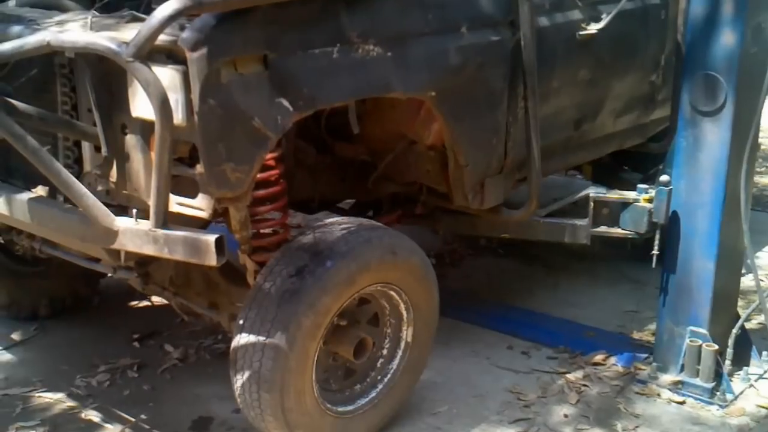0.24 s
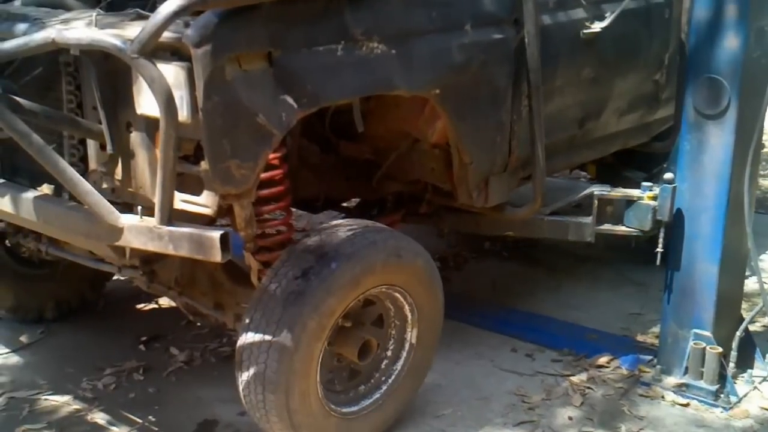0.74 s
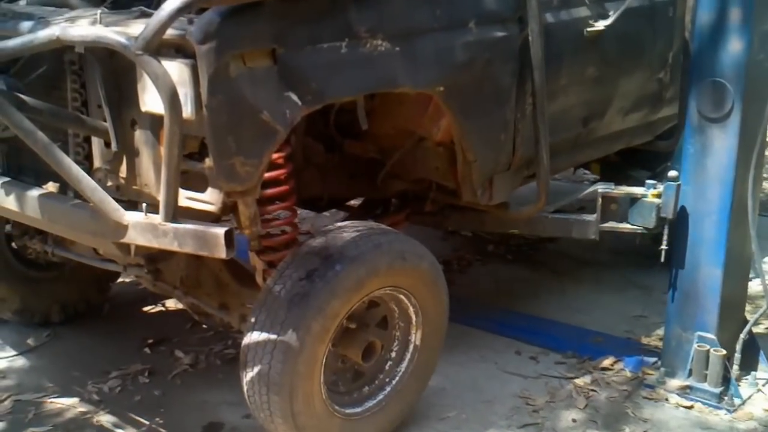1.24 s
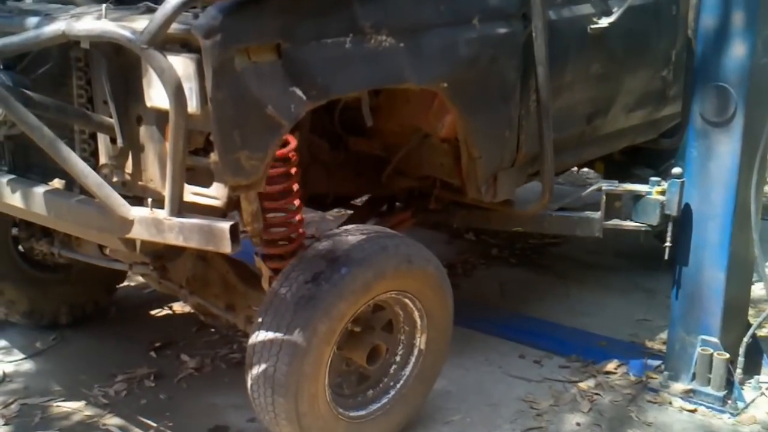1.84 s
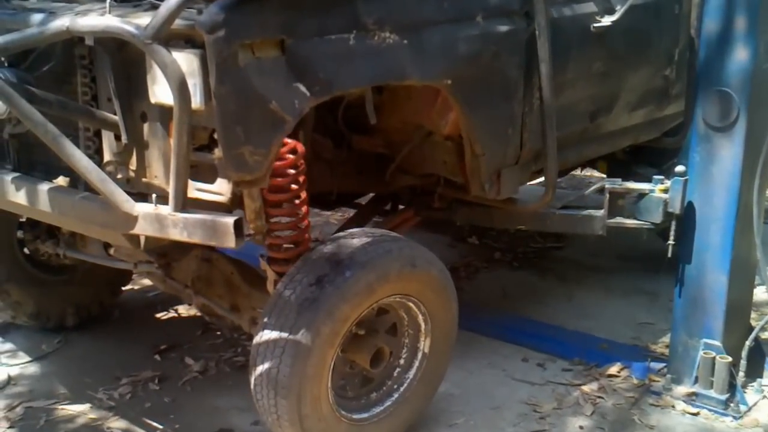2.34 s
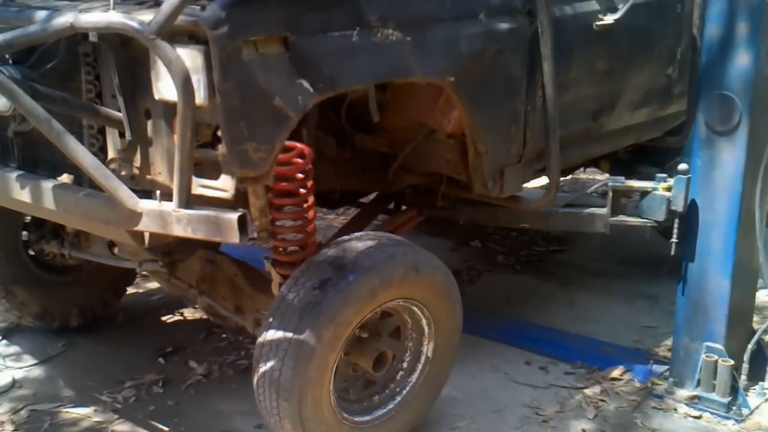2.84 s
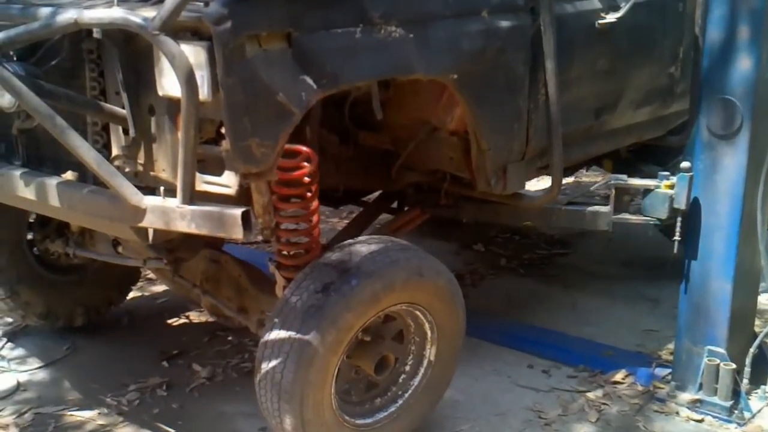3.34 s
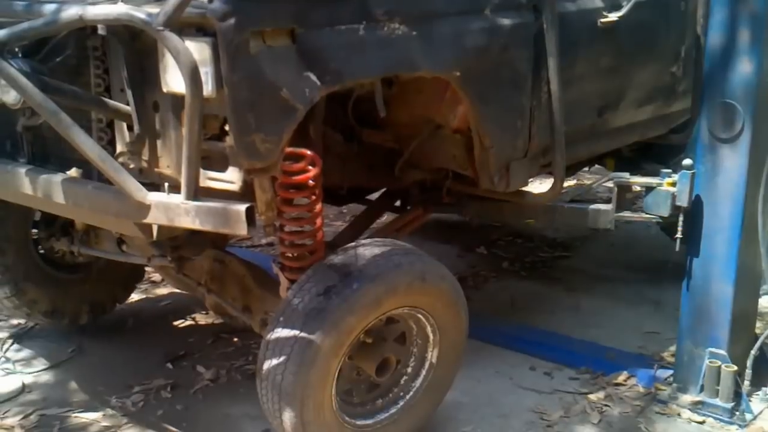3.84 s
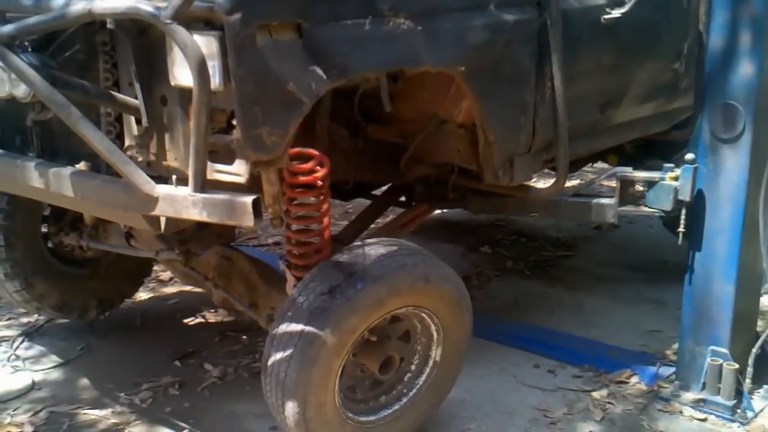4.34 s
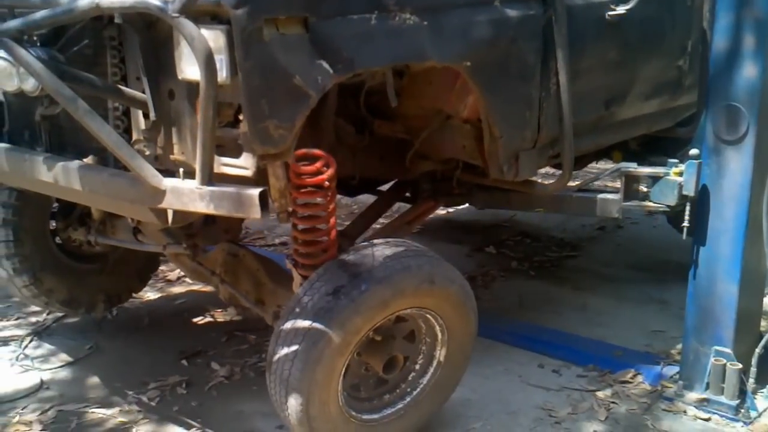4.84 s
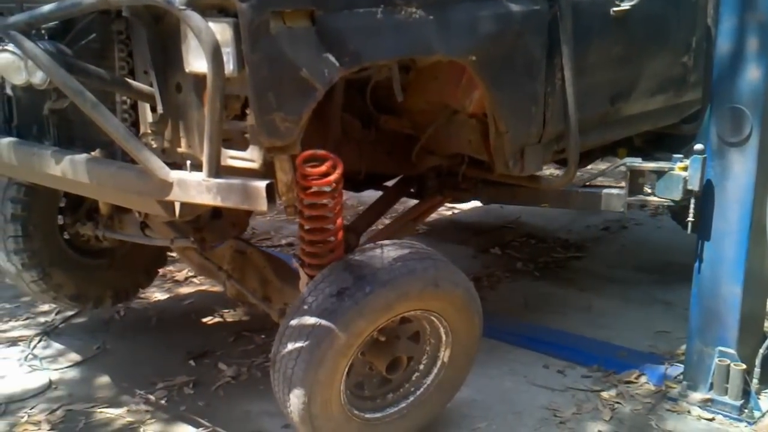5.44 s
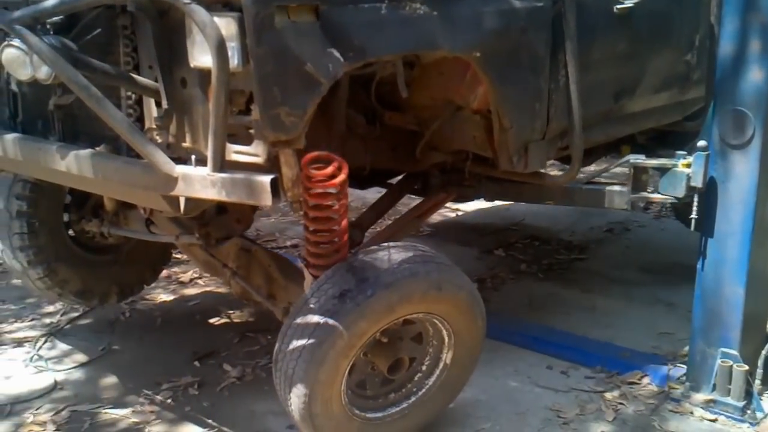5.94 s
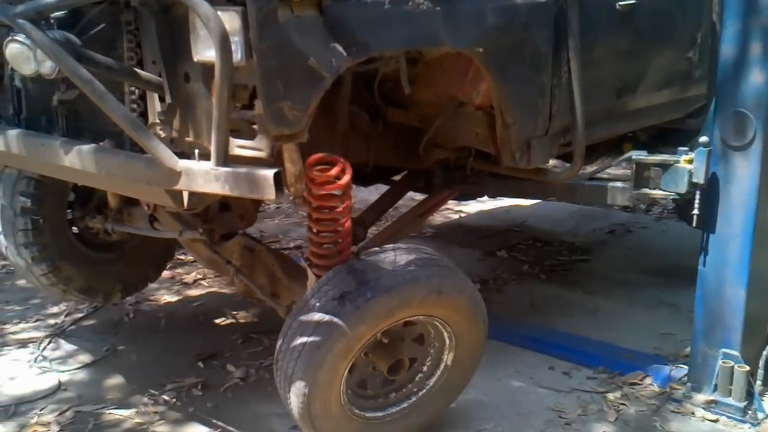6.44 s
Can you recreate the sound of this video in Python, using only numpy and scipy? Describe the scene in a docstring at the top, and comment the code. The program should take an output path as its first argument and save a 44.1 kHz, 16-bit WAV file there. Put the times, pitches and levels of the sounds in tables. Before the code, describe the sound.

An electric hydraulic pump whines steadily as a garage lift raises a truck, its safety latches clanking about every two seconds.

```python
"""An open-sided garage, heard on two spaced microphones: an electric hydraulic pump raises a two-post lift.
A worn eight-ball bearing and the pump shaft shake motor, tank and steel posts into a thicket of
wandering tones. About every two seconds the safety latches drop over a rung and bounce with a dull
clank. Underneath sit the motor's hum, a faint falling moan, the rush of oil and the hiss of the valves."""
import sys
import numpy as np
from scipy import signal
from scipy.fft import rfft, irfft
from scipy.io import wavfile

SR = 44100
rng = np.random.default_rng(int(sys.argv[2]) if len(sys.argv) > 2 else 0)


def transcribe(u):
    """Save the signal u as a 16-bit wav file named by the first command-line argument.

    u: samples, shape (n,) or (channels, n), limited to [-1, 1]; the rate is SR.
    q: integer samples, one column per channel.
    """
    v = np.clip(np.atleast_2d(u).T, -1, 1)
    q = np.round(v * 32767).astype(np.int16)
    wavfile.write(sys.argv[1], SR, q)


N = 295405

SHAFT_HZ, CAGE_HZ, BALL_HZ, BALLS = 58.74, 22.74, 240.6, 8   # settled turn rates, ball-flaw strike rate
BIN_HZ = np.maximum(np.fft.rfftfreq(N, 1 / SR), 1)
SIDES = np.array([[.5], [-.5]])   # left, right; a pan is left minus right

# the level sags after each clank and creeps back, on the quieter machine sounds: (time [s], level [dB])
MACHINE_FADER = [(0, -1), (.45, -0.5), (.7, -1.5), (2.25, 2), (2.4, -1.5), (3.2, 1), (3.55, 0), (4.2, 2.5),
                 (4.33, -1.5), (6.15, 1.5), (6.29, -3.5), (6.7, -2)]
# ball-flaw harmonics 1, 2, 3 ..: (cage sideband below [dB], harmonic [dB], cage sideband above [dB])
BALL_FLAW = [(-70, -52, -56), (-45, -44, -70), (-48.5, -70, -48.5), (-48.5, -54, -51.5), (-42.5, -70, -41),
             (-39.5, -49, -40), (-40.5, -70, -42), (-42, -54, -37), (-39, -49, -55), (-40, -35, -49),
             (-45.5, -52, -65), (-44.5, -58, -49), (-54, -70, -50), (-70, -70, -62)]
# harmonics of balls passing the outer race: (cage sideband below [dB], harmonic [dB], above [dB])
OUTER_RACE = [(-70, -54, -70), (-70, -70, -70), (-70, -48, -70), (-70, -58, -70), (-70, -53, -70),
              (-70, -70, -70), (-70, -49, -50), (-70, -47, -70), (-64, -51, -70), (-70, -39, -70),
              (-47, -43, -48), (-64, -70, -49), (-70, -70, -70), (-70, -55, -70), (-51, -52, -70),
              (-70, -70, -70), (-70, -70, -70), (-70, -59, -70), (-70, -70, -55)]
# harmonics of balls passing the inner race: (shaft sideband below [dB], harmonic [dB], above [dB])
INNER_RACE = [(-70, -49, -47.5), (-55, -56, -63), (-70, -70, -70), (-70, -50, -47.5), (-62, -49, -65),
              (-70, -52, -70), (-70, -40, -70), (-50.5, -39, -46), (-70, -52, -70), (-47, -70, -70),
              (-70, -52, -50), (-49.5, -55, -52), (-56.5, -57, -59), (-70, -61, -70)]
# shaft harmonics that stand out: (multiple of the shaft rate)
SHAFT_HARMONICS = [7, 9, 10, 18, 27, 47]
# their strengths: (level [dB])
SHAFT_LEVELS = [-42, -53, -53, -57, -62, -50]
# stray tones that follow the speed: (settled pitch [Hz])
STRAY_PITCHES = [417.9, 495.0, 1008, 1137, 1332, 1514, 1541.5, 1695.8, 1760.5, 1784.5, 1827.5, 2071.8,
                 2641.5, 3190.9, 3705, 3722]
# their strengths: (level [dB])
STRAY_LEVELS = [-48, -41.5, -60.5, -42.5, -58, -65, -48, -54, -49, -40.5, -49, -47, -44, -52, -59, -60]
# undergrowth of faint tones: (settled pitch [Hz], level [dB])
FAINT_TONES = [(216, -65), (273, -57), (327, -53), (517, -48), (600, -58), (634, -57), (664, -58),
               (728, -59), (768, -60), (786, -60), (866, -60), (963, -54), (1022, -57), (1033, -57),
               (1069, -54), (1251, -56), (1363, -56), (1497, -50), (1615, -45), (1638, -50), (1729, -46),
               (1796, -47), (1842, -49), (1865, -51), (1878, -51), (2045, -53), (2122, -50), (2263, -50),
               (2283, -44), (2344, -53), (2464, -55), (2485, -57), (2501, -57), (2524, -50), (2548, -56),
               (2569, -59), (2670, -51), (2744, -54), (2791, -54), (2939, -53), (2984, -55), (3029, -56),
               (3069, -59), (3273, -59), (3321, -58), (3345, -55), (3366, -59), (3391, -55), (3414, -60),
               (3434, -61), (3573, -63), (3587, -63), (3630, -61), (3767, -63), (3870, -65), (3946, -73),
               (3973, -67)]
# the two lead tones: (time [s], ball-flaw level [dB], outer-race level [dB])
LEAD_FADERS = [(0, -38, -49), (.3, -40, -31.5), (.55, -37, -37), (.75, -31.5, -37), (1.0, -42, -36),
               (1.35, -41, -39), (1.7, -37, -48), (1.95, -27.5, -30.5), (2.2, -32, -34.5),
               (2.6, -31.5, -32), (2.9, -26.5, -36.5), (3.1, -23.5, -28.5), (3.3, -22.5, -24.5),
               (3.55, -30.5, -32.5), (3.75, -32.5, -23), (4.1, -28, -28.5), (4.35, -34, -30.5),
               (4.55, -26, -38), (4.8, -36, -33), (5.0, -23.5, -36), (5.15, -31.5, -42), (5.35, -21.5, -43),
               (5.7, -19, -50), (5.95, -23, -41), (6.17, -23, -44), (6.27, -32, -46), (6.7, -42, -32.5)]
# tones bloom as the ball's spin axis shifts: (peak time [s], near pitch [Hz], level [dB], half-length [s])
TONE_SWELLS = [(0, 1661, -26, 0.087), (.15, 288, -41, 0.64), (.3, 1661, -32, .3), (.4, 3515, -49, .4),
               (.45, 2363, -32, .15), (0.5, 1466, -29, 0.15), (.5, 2142, -32, 0.19),
               (.75, 481, -30.5, 0.49), (.9, 1421, -34, .7), (0.9, 1180, -26.5, 0.3), (1.0, 2001, -37, 1.2),
               (.9, 2019, -32, .5), (1.05, 1466, -29, 0.13), (1.1, 1902, -34, .9), (1.2, 1707, -28, 0.3),
               (1.252, 458, -35, 0.35), (1.3, 2429, -38, .3), (1.3, 2706, -48, .5), (1.4, 1514, -35, .8),
               (1.35, 1948, -32, .3), (1.35, 1661, -28, 0.45), (1.4, 2304, -33, 1.1), (1.6, 3479, -46, 0.3),
               (1.65, 1226, -34, .15), (1.68, 1180, -29.5, .3), (1.7, 1466, -34, .2), (1.8, 1541, -35, .25),
               (1.8, 3456, -47, .5), (1.9, 3227, -41, .7), (2.0, 3105, -44, .4), (.45, 3227, -45, .6),
               (.7, 3150, -46, .2), (2.0, 3722, -50, .3), (2.0, 458, -29, 0.42), (1.95, 1137, -35, .35),
               (2.0, 1661, -32, .25), (2.1, 1707, -25, 0.3), (2.06, 1948, -29.5, 0.15),
               (2.1, 1008, -43, .3), (2.1, 2188, -38, .2), (2.1, 3515, -49, .3), (2.2, 1226, -34, .15),
               (2.3, 3150, -45, .6), (2.85, 1421, -35, 0.15), (3.0, 458, -38, .5), (3.1, 1948, -35, .4),
               (3.15, 1707, -33, .15), (3.3, 2188, -37, .3), (3.4, 2142, -30, .3), (3.5, 940, -39, 0.5),
               (3.6, 2363, -39, .4), (3.846, 1226, -31, 0.25), (3.9, 1586, -35, .3), (3.9, 1421, -34, .3),
               (3.9, 3515, -49, .2), (4.0, 1707, -30, 0.2), (4.1, 263, -41, .3), (4.4, 3722, -51, .3),
               (4.5, 3105, -44, .25), (4.856, 1421, -32, 0.2), (4.943, 481, -34.5, .35),
               (4.95, 1466, -33, .15), (4.0, 1180, -38, 1.0), (5.1, 1226, -30.5, 0.32),
               (5.1, 2188, -33, .9), (5.2, 346, -39, 1.5), (5.24, 2142, -27.5, 0.11), (5.4, 2363, -34, .3),
               (5.5, 1661, -31, 0.6), (5.5, 1541, -35, .4), (5.5, 1707, -33, .15), (5.5, 3105, -45, .4),
               (5.85, 1008, -38, .4), (5.5, 1948, -36, .5), (5.85, 2072, -39, .5), (5.85, 1760, -36, .4),
               (5.9, 2142, -28, .25), (6.0, 745, -39, 0.7), (5.95, 481, -37, 0.25), (6.0, 1466, -36, .5),
               (6.0, 3150, -46, .7), (5.95, 1137, -35, .12), (6.15, 2363, -33, .2), (6.3, 940, -41, 0.5),
               (6.5, 1707, -31, .2)]
# placing of the pump tones: (pitch [Hz], pan [dB])
TONE_PAN = [(400, -1), (510, -4), (1100, -2.5), (1500, 1.5), (1660, 6.5), (1710, 6), (1900, 5), (2150, -3),
            (2400, 1), (2900, -4), (3200, -9.5), (3500, 2)]

# latch drops and bounces: (time [s], thud [dB], ring [dB], knock [dB], clank [dB], clatter [dB],
# bite [dB], clatter and bite t60 [s])
LATCH_HITS = [(.480, -26, -14, -25, -21, -23, -50, 0.18), (.493, -25, -14.5, -17.5, -28, -24, -54, 0.22),
              (.53, -19, -17, -20, -35, -29, -56, .25), (2.294, -14, -23, -23, -13, -18, -42, 0.27),
              (2.311, -22, -22, -24, -22, -26, -48, 0.26), (2.33, -27, -20, -26, -29, -37, -52, .2),
              (2.352, -32, -28, -36, -36, -30, -52, .2), (4.243, -16, -28, -24, -15, -15.5, -33, 0.16),
              (4.262, -22.5, -28, -22, -15, -20, -29, 0.15), (4.279, -28, -35, -31, -16, -26, -36, 0.15),
              (4.298, -35, -42, -31, -29, -32, -44, .15), (4.319, -37, -35, -37, -29, -34, -50, 0.14),
              (4.925, -25, -42, -35, -40, -40, -60, .15), (6.182, -21, -38, -19, -17, -15.5, -36, 0.14),
              (6.192, -32, -19.5, -26, -14, -23, -36, 0.11), (6.211, -30, -30, -31, -17, -26, -44, 0.2),
              (6.231, -33, -31, -39, -18, -27, -50, 0.12), (6.25, -32, -35, -36, -30, -37, -54, .15)]
# modes of posts and latch: (pitch [Hz], level [dB], t60 [s], pan [dB])
STEEL_MODES = [(201.3, 1, 0.28, 0), (246.6, 0, 0.2, 1), (271, -3.5, 1.04, 0.5), (312.3, 1, 0.26, 4),
               (700.5, -3.5, 0.34, 4.5), (816, -3, 0.24, -3.5), (842, 2, 0.22, -4), (940, -1.5, 0.24, 1),
               (1023, -2.5, .12, 0), (1175, -1.5, 0.21, 1), (1700, 1.5, 0.12, 0), (1942, 4.5, 0.1, -15),
               (2037, 1.5, 0.21, -20), (2150, -1, 0.1, -14), (2250, -5, 0.083, -10)]
# steel-on-steel clatter: (frequency [Hz], level [dB])
CLATTER_EQ = [(150, -31), (300, 0), (520, -7), (800, 1), (1400, 2.5), (2000, -3), (2700, 4), (3600, -12.5),
              (5000, -28), (8000, -39), (14000, -35)]
# its placing: (frequency [Hz], pan [dB])
CLATTER_PAN = [(1500, 0), (1900, -14), (2200, -6), (2500, 0)]
# its bright edge: (frequency [Hz], level [dB])
BITE_EQ = [(2000, -30), (2800, 6), (3800, 1), (4800, -6.5), (5500, -12), (6200, -32)]

# motor hum, mostly on mains multiples: (pitch [Hz], level [dB])
HUM_TONES = [(120, -66), (176, -56), (240, -49), (300, -50), (360, -38)]
# the hum grows as the load comes on, then eases: (time [s], level [dB])
HUM_FADER = [(0, -4), (.8, -5.5), (1.8, -3), (2.6, 3), (3.5, 0), (4.2, 3), (5.5, -1.5), (6.7, -5)]
# faint falling moan: (time [s], pitch [Hz], level [dB])
MOAN_GLIDE = [(3.1, 364, -52), (3.35, 355, -35.5), (3.8, 335.5, -40), (4.299, 318, -60),
              (4.899, 310.6, -40.5), (5.3, 294, -43), (5.85, 287, -64)]
# oil and casing noise: (frequency [Hz], level [dB])
OIL_EQ = [(60, -13), (140, -23), (230, -17), (300, -12), (385, -14), (470, -3.5), (620, -14.5),
          (820, -14.5), (950, -11), (1150, -4), (1300, -11), (1400, -5), (1550, -3.5), (1800, -2),
          (2000, -6.5), (2350, -3.5), (2500, -9.5), (2800, -7), (3020, -13), (3300, -13), (4200, -22.5)]
# valve hiss: (frequency [Hz], level [dB])
VALVE_EQ = [(3000, -15), (4200, -30), (5600, -36.5), (7000, -28), (8600, -33), (10500, -33), (13000, -36)]

# placing of oil, hiss and bite: (frequency [Hz], pan [dB])
NOISE_PAN = [(100, -2), (600, -2), (1300, 0), (1900, 2), (2600, 0), (3200, -4), (4000, -1), (13000, 0)]
# noise arriving straight from the posts: (frequency [Hz], share of power [0-1])
DIRECT_SHARE = [(60, 0.035), (300, 0.15), (1200, 1), (2600, 1), (5200, 1), (8000, 0.7), (13000, 0.59)]
# noise alike in both channels: (frequency [Hz], share of the remaining power [0-1])
CENTRE_SHARE = [(2000, 0.038), (5000, 0.13), (13000, 0.84)]


def pump():
    """Bearing and shaft tones, all locked to the motor, which starts a touch fast and settles under load."""
    t = np.arange(0, N, STEP) / SR
    speed = 1 + .0058 * np.exp(-(t / 1.35) ** 1.6)
    clock = np.cumsum(speed) * STEP / SR
    tones = [*bearing_tones(BALL_HZ, CAGE_HZ, BALL_FLAW),
             *bearing_tones(BALLS * CAGE_HZ, CAGE_HZ, OUTER_RACE),
             *bearing_tones(BALLS * (SHAFT_HZ - CAGE_HZ), SHAFT_HZ, INNER_RACE),
             *zip(SHAFT_HZ * np.array(SHAFT_HARMONICS), SHAFT_LEVELS),
             *zip(STRAY_PITCHES, STRAY_LEVELS), *FAINT_TONES]
    pitches = np.array(tones)[:, 0]
    fader_db = automation(MACHINE_FADER)[0][::STEP]
    powers = [amp(db + fader_db + 3 * drift(1, STEP)) ** 2 for _, db in tones]   # each wanders alone
    for peak_s, hz, db, half_s in TONE_SWELLS:
        nearest = np.argmin(abs(pitches - hz))
        powers[nearest] += amp(db) ** 2 * np.exp(-((t - peak_s) / half_s) ** 2)
    out = sum(tone(clock, hz, 10 * np.log10(power), at_hz(TONE_PAN, hz),
                   waver_db=1.0, wobble_rad=0.13, flutter=0.06) for hz, power in zip(pitches, powers))
    lead_pitches = 2 * BALL_HZ + CAGE_HZ, 6 * BALLS * CAGE_HZ
    for hz, db in zip(lead_pitches, automation(LEAD_FADERS)):
        out += tone(clock, hz, db[::STEP], at_hz(TONE_PAN, hz),
                    waver_db=0.6, wobble_rad=0.08, flutter=0.03)
    return full_rate(out)


def bearing_tones(rate_hz, sideband_hz, rows, gate_db=-62):
    """Repeating strikes make harmonics with a sideband either side: (pitch [Hz], level [dB])."""
    return [(harmonic * rate_hz + side * sideband_hz, db) for harmonic, row in enumerate(rows, 1)
            for side, db in zip((-1, 0, 1), row) if db > gate_db]


def latches():
    """Each drop or bounce clatters and sets the steel ringing; the slim posts radiate little bass."""
    return low_cut(clatter() + steel_ring(), hz=249)


def clatter():
    """Steel hits steel: a short, uneven burst of noise with a bright bite."""
    t, body_env, bite_env = np.arange(N) / SR, 0, 0
    for start_s, *_, clatter_db, bite_db, t60 in LATCH_HITS:
        age = np.maximum(t - start_s, 0)
        burst = (1 - np.exp(-age / 0.00028)) * amp(-60 * age / t60)
        body_env += amp(clatter_db) * burst
        bite_env += amp(bite_db) * burst
    body = unit_rms(irfft(stereo_spectrum(CLATTER_EQ, CLATTER_PAN), N))
    bite = unit_rms(irfft(stereo_spectrum(BITE_EQ), N))
    return (body * body_env + bite * bite_env) * amp(1.6 * drift(55.0))


def steel_ring():
    """Blows excite the modes: a low thud, the post's ring, the carriage's knock, the latch's clank."""
    onsets = [round(row[0] * SR) for row in LATCH_HITS]
    scatter = rng.normal(0, 3.0, (len(LATCH_HITS), len(STEEL_MODES)))
    thud, ring, knock, clank = np.array(LATCH_HITS)[:, 1:5].T
    out = 0
    for (hz, db, t60, pan_db), scatter_db in zip(STEEL_MODES, scatter.T):
        blow_db = clank if hz > 1500 else knock if hz > 600 else ring if 230 < hz < 290 else thud
        blows = np.full(N, 1e-18)
        blows[onsets] = amp(blow_db + db + scatter_db - 6.0)
        w, decay = 2 * np.pi * hz / SR, amp(-60 / (t60 * SR))
        spread = np.exp(-hz / SR)   # the blow spreads through the steel: an attack of about one cycle
        push = 2 * (1 - spread) * resonate(blows, w, spread) * rng.choice([-1, 1])
        out += amp(SIDES * pan_db - abs(pan_db) / 2) * resonate(push, w, decay)
    return out


def motor():
    """Fluttering mains hum, with a faint moan gliding down through it."""
    t = np.arange(0, N, STEP) / SR
    hum = sum(tone(t, hz, db, pan_db=-1.6, waver_db=2.0, wobble_rad=0.3, flutter=0.29)
              for hz, db in HUM_TONES)
    moan_hz, moan_db = automation([(0, 362, -99)] + MOAN_GLIDE + [(6.1, 380, -99)])
    moan = np.sqrt(2) * amp(moan_db + 1.8 * drift(5.8)) * np.sin(2 * np.pi * np.cumsum(moan_hz) / SR)
    return full_rate(hum) * amp(automation(HUM_FADER)[0]) + moan


def oil_flow():
    """Oil rushes through the casing and hisses in the valves."""
    rush = noise_bed(OIL_EQ, waver_db=2.0, top_hz=3560)
    hiss = noise_bed([(1500, -27.5)] + VALVE_EQ, waver_db=1.23, top_hz=16000)
    return amp(-26.5) * rush + amp(-38) * hiss


def noise_bed(eq, waver_db, top_hz):
    """Noise in overlapping octave bands, each wavering on its own and all a little together; rms 1."""
    spectrum = stereo_spectrum(eq) / np.sqrt(1 + (BIN_HZ / top_hz) ** 8)
    together, out = drift(4.4), 0
    octave = np.clip(np.log2(BIN_HZ / 200), 0, 6)
    for band in range(7):
        mask = np.clip(1 - abs(octave - band), 0, 1)
        out += irfft(spectrum * mask, N) * amp(waver_db * (.5 * together + drift(16.0)))
    return unit_rms(out)


def tone(clock, hz, level_db, pan_db, waver_db, wobble_rad, flutter):
    """One restless partial; it comes from both posts, so its stereo image swings slowly."""
    phase = 2 * np.pi * (hz * clock + rng.random()) + wobble_rad * drift(4.7, STEP)
    slip = half_slip(hz) + 0.17 + 0.083 * drift(0.73, STEP)
    swing = np.pi / 2 + 0.99 * drift(0.37, STEP)
    level = amp(level_db + waver_db * drift(5.5, STEP) + SIDES * pan_db)
    level *= 1 + flutter * drift(18.0, STEP)   # gives the tone a rough skirt
    mid, side = np.cos(slip) * np.sin(phase), np.sin(slip) * np.sin(phase + swing)
    return np.sqrt(2) * level * (mid + 2 * SIDES * side)


def stereo_spectrum(eq, pan=NOISE_PAN, left_share=0.59):
    """Noise straight from each post, leading on its own side, plus a centred and a diffuse part."""
    left, right, centre, *diffuse = rfft(rng.standard_normal((5, N)))
    share, alike = (np.clip(at_hz(curve, BIN_HZ), 0, 1) for curve in (DIRECT_SHARE, CENTRE_SHARE))
    lead = np.exp(2j * SIDES * half_slip(BIN_HZ))
    direct = np.sqrt(left_share) * left * lead + np.sqrt(1 - left_share) * right / lead
    wash = np.sqrt(alike) * centre + np.sqrt(1 - alike) * np.array(diffuse)
    blend = np.sqrt(share) * direct + np.sqrt(1 - share) * wash
    return blend * amp(at_hz(eq, BIN_HZ) + SIDES * at_hz(pan, BIN_HZ))


def half_slip(hz, in_step_hz=1327, hz_per_turn=2620):
    """Half the phase [rad] by which sound from one side slips between the microphones."""
    return np.pi * np.maximum(hz - in_step_hz, 0) / hz_per_turn


def drift(rate_hz, step=1):
    """Smooth random modulation of rms about 1: noise through two one-pole low-passes."""
    pole = np.exp(-200 * np.pi * rate_hz / SR)
    noise = rng.standard_normal(N // 100 + 1002)
    slow = signal.lfilter([1], [1, -2 * pole, pole * pole], noise)[1000:]
    return np.interp(np.arange(0, N, step) / 100, np.arange(len(slow)), unit_rms(slow))


def resonate(x, w, decay):
    """Ring at w [rad/sample], shrinking by the factor decay each sample."""
    return signal.lfilter([0, np.sin(w)], [1, -2 * decay * np.cos(w), decay * decay], x)


def automation(rows):
    """Breakpoints in time to curves, one value a sample."""
    times, *columns = np.transpose(rows)
    return [np.interp(np.arange(N) / SR, times, column) for column in columns]


def at_hz(points, hz):
    """Read a curve on a log-frequency axis."""
    freqs, values = np.transpose(points)
    return np.interp(np.log(hz), np.log(freqs), values)


def full_rate(x):
    """Upsample the tones to SR."""
    return signal.resample_poly(x, STEP, 1, axis=-1)[..., :N]


def low_cut(x, hz):
    """Fourth-order high-pass."""
    return signal.sosfilt(signal.butter(4, hz, "high", fs=SR, output="sos"), x)


def amp(db):
    """Decibels to gain."""
    return 10 ** (np.asarray(db) / 20)


def unit_rms(x):
    """Scale to rms 1."""
    return x / np.sqrt(np.mean(x ** 2) + 1e-20)


def scene():
    """Pump tones and latch clanks over a bed of motor and oil."""
    oil = oil_flow()
    return pump() + amp(automation(MACHINE_FADER)[0]) * (motor() + oil) + latches()


def record(dry):
    """The microphones thin the bass, peaks are rounded, the top is cut."""
    rounded = 1.5 * np.tanh(low_cut(dry, hz=148) / 1.5)
    return signal.sosfilt(signal.ellip(12, .5, 65, 13900, fs=SR, output="sos"), rounded)


STEP = 5   # tones are drawn at every fifth sample

dry = scene()
out = record(dry)
transcribe(out)
```